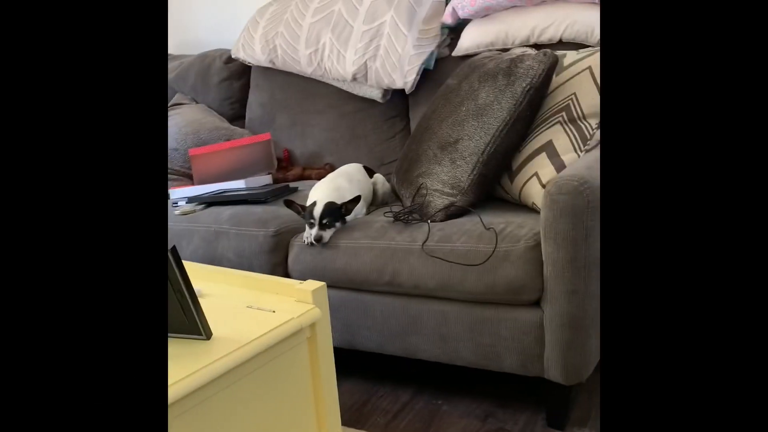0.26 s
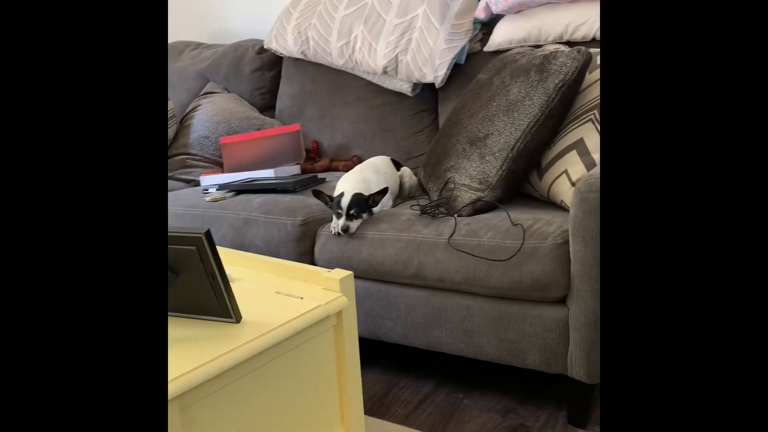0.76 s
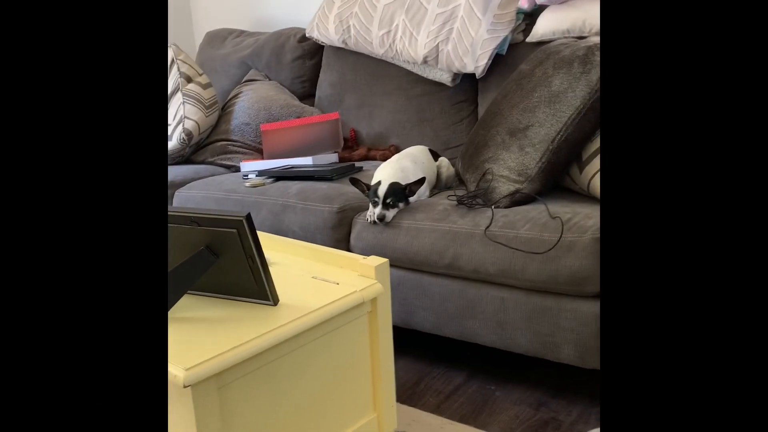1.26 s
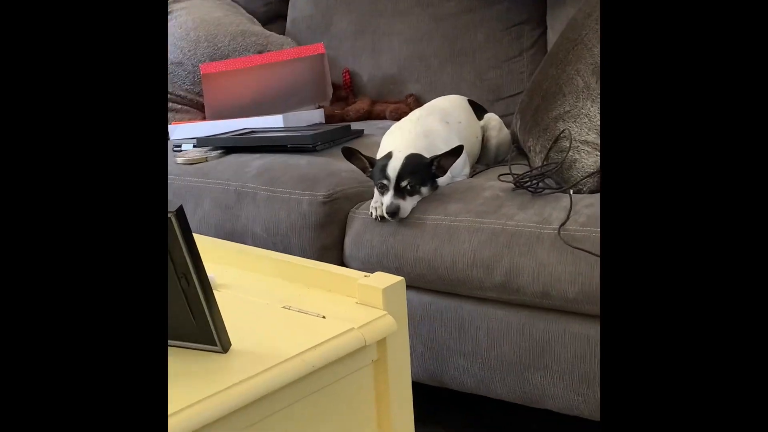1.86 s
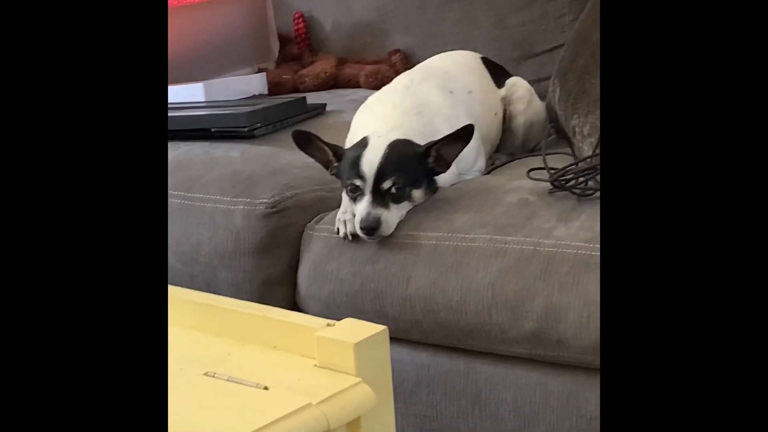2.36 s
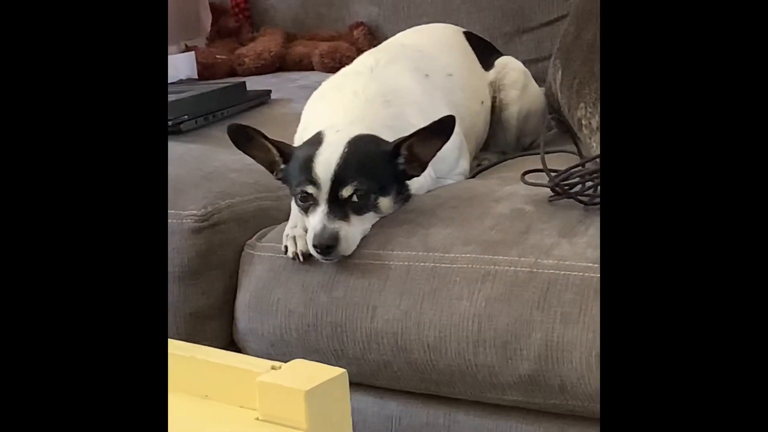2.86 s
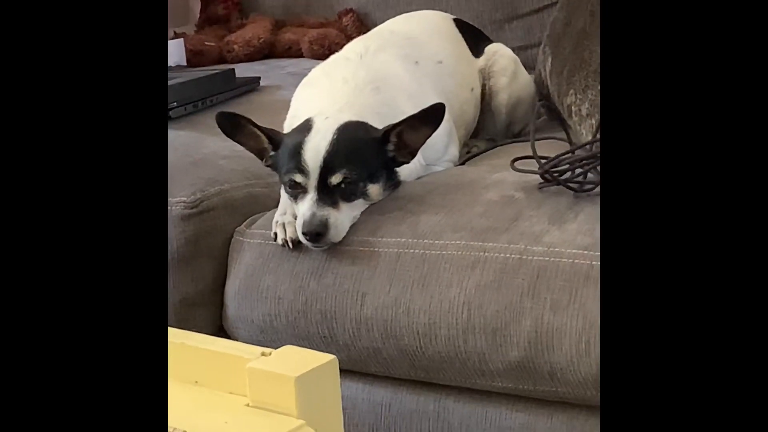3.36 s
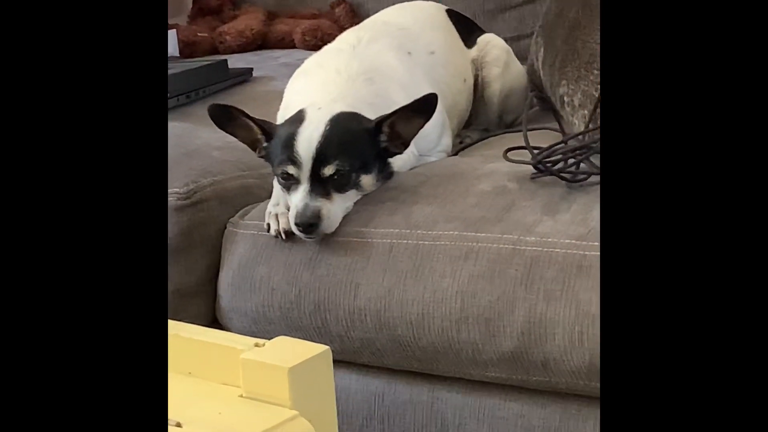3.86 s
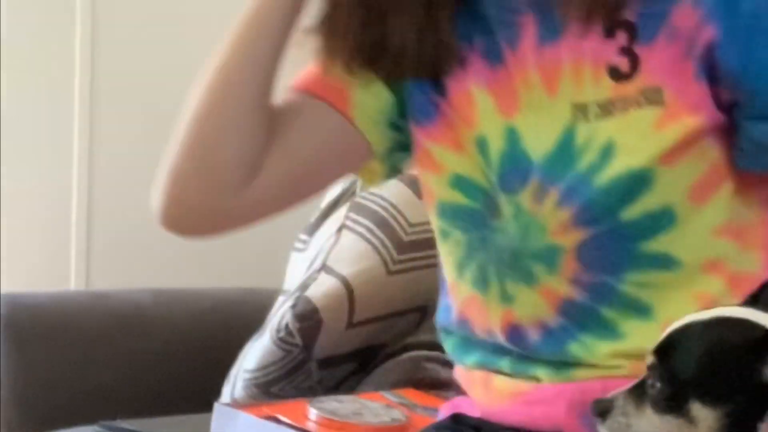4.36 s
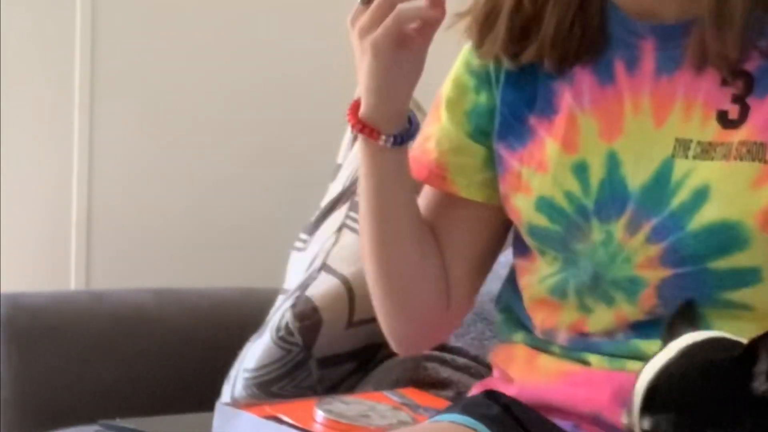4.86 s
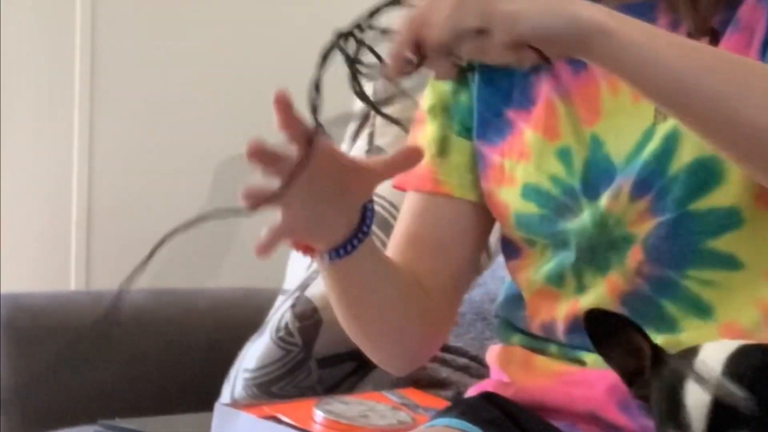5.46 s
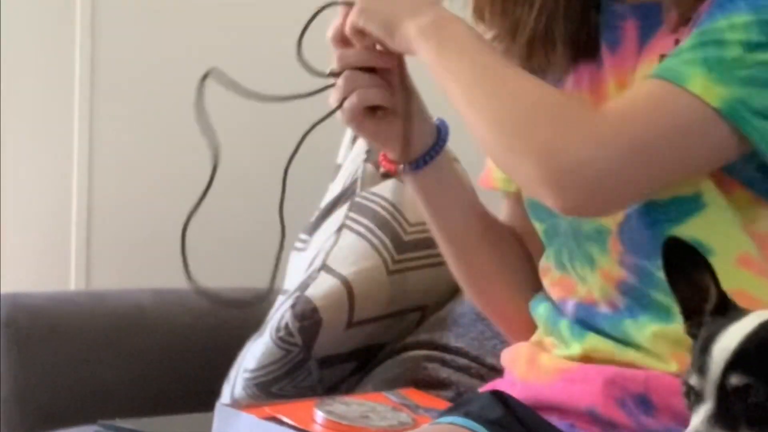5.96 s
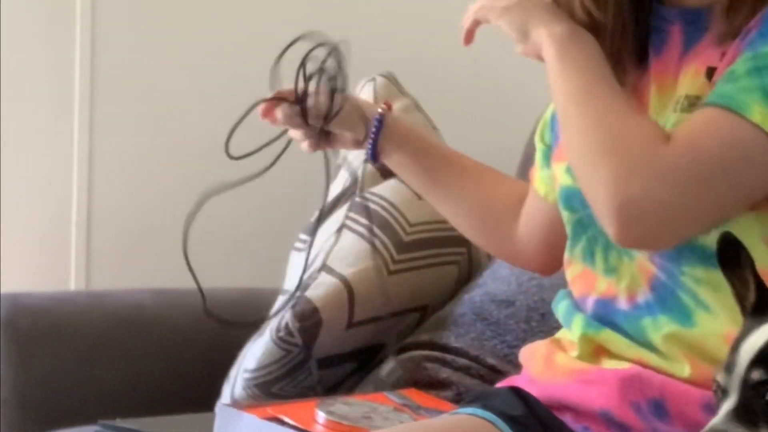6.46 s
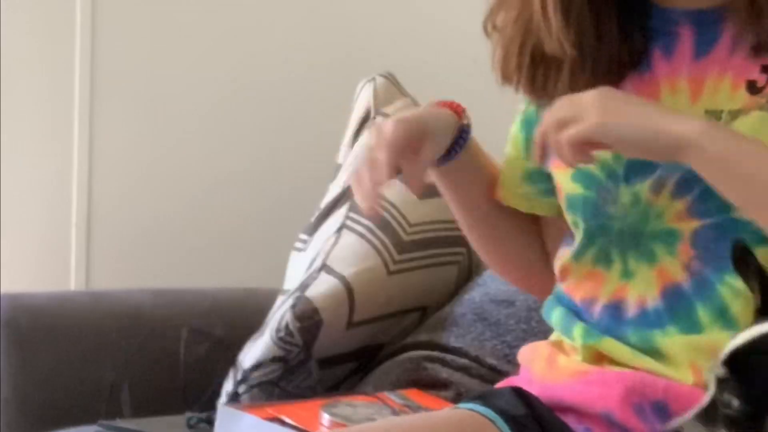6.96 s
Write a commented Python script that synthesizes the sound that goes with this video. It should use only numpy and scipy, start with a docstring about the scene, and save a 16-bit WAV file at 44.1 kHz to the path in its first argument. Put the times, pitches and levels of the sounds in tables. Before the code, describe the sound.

A vacuum cleaner runs in a living room, a broad airy rush with hollow ringing, low hum and thin fan whine. A little over halfway it switches abruptly to the same room at rest: soft bassy room tone and faint cloth and cord rustling. Near the end something small and hard hits with a loud sharp crack, then bounces and clatters briefly. Phone-like stereo microphone in the room.

```python
"""A vacuum cleaner runs in a living room: turbulent air excites duct resonances, with motor hum and fan tones.
The scene then changes to the same room at rest: cloth and a cord rustle as grains of shaped noise, with faint
squeaks and ticks, then a small hard thing drops and bounces; each blow is a noise crack plus decaying modes.
Under both lie the beating drone tones of the house; the room at rest adds a bass-heavy wash of noise.
"""
import sys
import numpy as np
from scipy import signal
from scipy.fft import rfft, irfft, next_fast_len
from scipy.io import wavfile
from scipy.ndimage import uniform_filter1d

SR = 44100
rng = np.random.default_rng(int(sys.argv[2]) if len(sys.argv) > 2 else 0)


def file_out(sig):
    """Save sig as 16-bit WAV at sys.argv[1]."""
    # one column per channel
    cols = np.atleast_2d(sig).T
    # limit, then scale
    lim = np.clip(cols, -1, 1)
    pcm = np.round(lim * 32767).astype(np.int16)
    wavfile.write(sys.argv[1], SR, pcm)


N = 317254
T = np.arange(N) / SR  # time axis [s]

# Noise spectrum of the quiet room, relative: (frequency [Hz], density [dB per Hz])
ROOM_SPECTRUM = [(25, -31), (45, -6), (70, -2), (130, -3), (200, -4.5), (260, -7.5), (350, -9),
                 (430, -10.5), (480, -14.5), (650, -14.5), (900, -21.5), (2000, -30), (2800, -36),
                 (3500, -42.5), (8000, -54), (15500, -56), (15900, -87)]
# Standing waves of the room: (frequency [Hz], width [Hz], lift [dB])
STANDING_WAVES = [(97, 27, 7.5), (166, 45, 4.5), (233, 22, 1), (387, 52, 0.5)]
# Two close tones of the house, which beat: (frequency [Hz], level [dB], wander [Hz])
DRONE_TONES = [(54.47, -45.5, 0.32), (58.83, -56, 0.21)]
# Wavering of the drone: (time [s], level [dB])
DRONE_LEVEL = [(0, -2), (.5, 0), (1.3, 0), (1.75, -3), (2.3, 1), (2.9, -2), (3.5, 0.5), (4.1, -2), (4.5, 1),
               (5.5, 1), (6.4, -.5), (7.19, 0)]
# Strokes of cloth and cord, and the noisy wash around the hits of the small hard thing, before the fibre colour:
# (peak time [s], level [dB], brightness [dB per octave], rise [s], fall [s])
NOISE_SWELLS = [(4.08, -65.5, -3.5, 0.035, 0.59), (4.2, -67, -8, 0.16, 0.27), (4.4, -74.5, -16, 0.14, 0.18),
                (4.82, -71, -3, 0.11, .4), (5.08, -66.5, -6, 0.087, .07), (5.145, -63.5, -13.5, .01, 0.17),
                (5.18, -58.5, -2, 0.073, 0.19), (5.3, -66, -5, .09, .03), (5.42, -72, -4, .15, .15),
                (5.53, -61, -13.5, 0.025, 0.18), (5.81, -72, -10, .04, .03), (6.12, -70, -12, 0.22, 0.88),
                (6.2, -74, -4, .02, 0.044), (6.275, -54, -3, 0.023, 0.11), (6.499, -46.5, -6, 0.01, .02),
                (6.515, -42.5, -2, 0.016, 0.21), (6.704, -38.5, -4, 0.01, 0.078),
                (6.735, -41.5, -5, 0.035, 0.08), (6.84, -57, -12, 0.065, 0.26),
                (7.015, -53.5, -7, 0.13, 0.088)]
# Spectrum that the rubbed fibres favour: (frequency [Hz], lift [dB])
FIBRE_COLOUR = [(200, -7.5), (700, -3.5), (1300, 0), (2500, 2.5), (3300, 3.5), (4200, -5.5), (5500, 8),
                (7000, 1.5), (9000, -3.5), (11500, -4.5), (15600, -11), (15900, -50)]
# Faint thin squeaks: (peak time [s], frequency at the peak [Hz], level [dB])
SQUEAK_EVENTS = [(6.055, 3230, -69), (6.15, 2510, -66)]
# Sharp blows: faint ticks of the cord first, then the small hard thing dropping and bouncing; before the walls:
# (time [s], peak level [dB], brightness [dB per octave], ringing share [0-1], strongest ring [Hz])
BLOWS = [(4.0073, -85, 0, 0.4, 8000), (5.145, -56, -2, 0.1, 2140), (5.528, -57, -10, 0.5, 2650),
         (5.55, -52, -9, .8, 2650), (6.266, -47, -2, 0.3, 2320), (6.5036, -6.5, 4.5, 0.33, 9500),
         (6.5052, -11.5, -3, 0.32, 8030), (6.5072, -23, -5, 0.5, 1090), (6.5086, -18, 0, 0.1, 6690),
         (6.5096, -8.5, 8.5, 0.65, 6050), (6.5113, -20, 4.5, 0.4, 3270), (6.5143, -16, -2, 0.37, 6690),
         (6.5172, -25, 4, 0.4, 1590), (6.5195, -24, 2, 0.3, 9300), (6.5217, -23, -4, 0.5, 6000),
         (6.527, -37, -4, .8, 430), (6.534, -27, 3.5, 0.7, 6000), (6.557, -36, -2, .8, 2140),
         (6.669, -39, -10, 0.5, 1600), (6.6973, -27, -3, 0.35, 1600), (6.7036, -35, 4, 0.43, 3270),
         (6.7062, -31, -3, 0.46, 1600), (6.7085, -33, -6, 0.4, 1090), (6.717, -28, -8, 0.6, 1600),
         (6.726, -25, 3, 0.1, 9300), (6.7257, -23.5, -4, 0.9, 1800), (6.732, -28, -5, .3, 1600),
         (6.736, -28, -4, 0.8, 1800), (6.742, -38, -2, 0.7, 1600), (6.7597, -42, -4, .4, 2140),
         (6.772, -43, -5, 0.4, 2140), (6.8383, -36, -14, 0.8, 1590), (6.85, -48, -6, 0.6, 2140),
         (6.889, -48, -6, 0.3, 2140), (7.014, -37.5, -15, 0.65, 1600), (7.022, -40, -10, .5, 2140),
         (7.027, -37, -16, 0.5, 1090)]
# Modes that blows and ticks excite, relative: (frequency [Hz], level [dB], t60 [s])
BODY_MODES = [(430, -8.5, 0.035), (870, -11, .015), (1090, -9.5, 0.013), (1450, -9.5, 0.028),
              (1610, -10.5, 0.02), (1800, -4, 0.011), (2110, -5, 0.022), (2650, -2, 0.0091),
              (3270, 2.5, 0.01), (3800, -2, .012), (4440, -15, 0.0052), (5980, 6.5, 0.0061),
              (6690, -0.5, 0.0051), (7400, -7, 0.0027), (8400, -3.5, .003), (9300, -6, .003),
              (10300, -8, 0.0029), (11400, -10, .003)]
# Bursts of tiny ticks: the cord rattling, then the small hard thing clattering after its hits:
# (peak time [s], level [dB], rise [s], fall [s], strongest ring [Hz])
TICK_BURSTS = [(5.17, -61, 0.042, 0.14, 1450), (5.535, -60, 0.013, 0.13, 2650),
               (6.272, -63, .008, 0.072, 8400), (6.509, -38.5, .006, .04, 1190),
               (6.525, -47, .012, .1, 6300), (6.55, -47, 0.033, .1, 2100), (6.60, -55, 0.037, 0.11, 1090),
               (6.704, -40.5, 0.0072, .03, 1450), (6.732, -40.5, .025, 0.041, 1700),
               (6.775, -55, 0.019, 0.09, 2100), (6.861, -57, 0.038, .15, 1450),
               (7.022, -59, 0.026, 0.068, 1600)]
# Reverberation of the walls: (frequency [Hz], t60 [s])
WALL_DECAY = [(300, 0.7), (1500, 0.56), (4000, 0.31), (8000, 0.21), (15000, 0.18)]
# Airflow of the vacuum at work: (time [s], level [dB])
AIRFLOW = [(0, -28.5), (.35, -27), (.7, -27), (1.2, -26.5), (1.55, -27.5), (1.9, -26.5), (2.15, -26),
           (2.4, -26), (2.6, -26.5), (2.9, -26), (3.35, -27), (3.9, -26)]
# Spectrum of the rushing air, relative: (frequency [Hz], density [dB per Hz])
AIR_SPECTRUM = [(25, -33), (45, -10), (70, -11), (95, 4), (135, -3), (170, -1), (260, -4.5), (600, -3),
                (1200, 0), (2000, 1), (3100, -0.5), (3800, -7.5), (4500, -13), (5100, -9), (6000, -9),
                (7500, -11.5), (8200, -12.5), (9300, -25.5), (10000, -12), (12500, -20), (14000, -20.5),
                (15650, -25.5), (15950, -72)]
# Resonances of hose, housing and walls: (frequency [Hz], width [Hz], mean lift [dB])
DUCT_MODES = [(92, 15, 1), (166, 19, 5), (213, 7.5, 2.5), (335, 48, 6.5), (437, 31, 5.5), (481, 22, 6),
              (538, 11, 6), (766, 46, 2), (949, 36, 7.5), (1139, 49, 3), (1311, 36, 5.5), (1551, 16, 0.5),
              (1786, 23, 4.5), (2180, 13.4, 6.5), (2852, 22, 9.5), (2970, 9.6, 1), (3120, 14, 11),
              (3225, 18, 5.5), (3440, 16, 3)]
# Tones of the fan: (frequency [Hz], mean level [dB], wander [Hz])
FAN_TONES = [(625, -49, 1.5), (4374, -54, 5)]
# The two ports at the vacuum: (frequency [Hz], likeness [0-1], left-right level [dB], left lead [rad])
VACUUM_PORTS = [(150, 1, 1.4, 0), (210, .98, 2, .03), (330, .96, 2.5, .25), (420, .88, 3.5, .5),
                (520, .65, 4.5, 1.5), (650, .2, 5.5, 0), (800, .55, 2.5, 0), (1000, .5, .5, .4),
                (1800, .4, .5, 1.), (2100, .15, .5, 2.), (2300, .45, .5, 3.1), (3000, .68, .5, 2.9),
                (3800, .55, .5, 2.), (4300, .78, 0, 2.3), (4550, .9, 0, 2.7), (4800, .97, 0, 3.14),
                (15300, .95, 0, 19.05)]
# The ports once the microphone has turned:
# (frequency [Hz], likeness [0-1], left-right level [dB], left lead [rad])
REST_PORTS = [(102, 0.99, -0.5, 0), (200, 0.99, -1.5, 0.3), (325, 0.95, -2, 0.5), (785, 0.4, 0, 2),
              (1700, 0.36, -0.5, 4), (2460, 0.5, 0.5, 4.1), (3500, .65, 0, 3.8), (4100, .9, 0, 3.7),
              (4720, .995, 0, 3.14), (16500, .99, 0, -5.9)]

FADE_OUT, FADE_IN = (3.918, 3.952), (3.949, 3.962)  # (from [s], to [s])
BASS_CUT_HZ, EDGE_HZ = 24, 16300
SIZE, HOP = 2048, 512  # samples per frame and step, for slow noises
ROOM_DB = -45
DRONE_MODE_HZ, DRONE_MODE_WIDTH_HZ, DRONE_MODE_DB = 54.6, 1.4, -61  # the room mode that blurs the drone
STROKE_DB = 20.0  # dB gained in one rise time and lost in one fall time
# Faint restless rubbing between the strokes: level [dB], brightness [dB per octave], unevenness [dB]
FIDGET_DB, FIDGET_TILT_DB, FIDGET_SPREAD_DB = -83.5, 2, -4.5
SQUEAK_RISE_S, SQUEAK_FALL_S, SQUEAK_LENGTH_S, SQUEAK_HZ_PER_S = 0.04, 0.11, 0.12, 700.0
RATTLE_PER_S, RATTLE_SPREAD_DB = 450.0, 4.0  # tick rate; spread of tick sizes
RATTLE_FOCUS_DB, RATTLE_FOCUS_OCTAVES = 22.0, 0.45  # lift of the strongest ring and its reach
HUM_HZ, HUM_DB = 120.0, -41.5  # twice the mains rate; level of its pure tone
ROAR_DB, HISS_DB = -4, 0.5  # lift of nozzle roar and hiss against the airflow
ROAR_STEADY, HISS_STEADY = 0.29, 0.41  # how far each resists the airflow's swells [dB per dB]
WHINE_WAVER_DB = 1.5  # the fan tones come and go in the turbulence
DUCT_WAVER_DB, DUCT_WANDER = 1.7, 0.005  # swell of each resonance; slide as a share of its pitch


def gain_of(db):
    """Amplitude ratio: 20 dB is a factor of ten."""
    return 10 ** (np.asarray(db) / 20)


def evened(x):
    """Normalisation to unit rms."""
    return x / np.sqrt(np.mean(x ** 2) + 1e-20)


def read(points, hz):
    """Interpolation of a spectrum along logarithmic frequency."""
    f, value = np.transpose(points)
    return np.interp(np.log(hz + 1), np.log(f + 1), value)


def curve(rows, t, axis):
    """Linear interpolation of one table column over time."""
    return np.interp(t, [r[0] for r in rows], [r[axis] for r in rows])


def tone(hz, wander_hz):
    """Frequency modulation: a sine of unit rms with a slowly wandering pitch."""
    noise_in = rng.standard_normal(N)
    drift = evened(uniform_filter1d(uniform_filter1d(noise_in, size=4000), size=4000))
    return np.sqrt(2) * np.sin(2 * np.pi * np.cumsum(hz + wander_hz * drift) / SR)


def band(hz, width):
    """Resonance of noise: a one-pole complex envelope shifted to a carrier, at unit rms."""
    pole = np.exp(-np.pi * width / SR)
    a, b = rng.standard_normal((N + SR, 2)).T
    envelope = signal.lfilter([1], [1, -pole], a + 1j * b)[SR:]  # the first second settles the filter
    carrier = np.exp(2j * np.pi * np.cumsum(hz * np.ones(N)) / SR)
    return evened((envelope * carrier).real)


def patches(frames, bins, size):
    """Smoothed random field of unit rms; size is (bins, frames)."""
    field = rng.standard_normal((frames, bins)).T
    return evened(uniform_filter1d(uniform_filter1d(field, size[0], 0), size[1], 1))


def noise(field_db, size, hop):
    """Spectral shaping: two unrelated noises under one time-frequency field."""
    a, b, c, d = rng.standard_normal(field_db.T.shape + (4,)).T
    z = np.array([a + 1j * b, c + 1j * d]) * gain_of(field_db)
    return signal.istft(z, nperseg=size, noverlap=size - hop)[1][:, :N]


def ringing_db(modes, hz):
    """Resonance: Lorentzian peaks added to a flat power spectrum."""
    peaks = sum(gain_of(db) ** 2 / (1 + (2 * (hz - f) / w) ** 2) for f, w, db in modes)
    return 10 * np.log10(1 + peaks)


def stroke_db(t, s, rise, fall):
    """Exponential growth and decay: straight lines in dB about a peak."""
    return -STROKE_DB * np.where(t < s, (s - t) / rise, (t - s) / fall)


def ports(table, direct, diffuse):
    """Partial coherence: both ports share direct; only the right one takes diffuse."""
    f, like, tilt_db, lead = np.transpose(table)
    n = next_fast_len(N)
    hz, shared = np.fft.rfftfreq(n, 1 / SR), rfft(direct, n)
    same = np.clip(np.interp(hz, f, like), 0, 1)
    delayed = same * shared * np.exp(-1j * np.interp(hz, f, lead))
    right = delayed + np.sqrt(1 - same ** 2) * rfft(diffuse, n)
    tilt = gain_of(np.interp(hz, f, tilt_db) / 2)
    return irfft(np.array([shared * tilt, right / tilt]), n)[:, :N]


def room():
    """Standing waves: a bass-heavy wash of noise gathers in a few room resonances."""
    frames, hz = N // HOP + 5, np.fft.rfftfreq(SIZE, 1 / SR)
    uneven_db = np.clip(hz / 320.0, 0, 1)[:, None] * 2.7 * patches(frames, len(hz), size=(9, 9))
    field = (read(ROOM_SPECTRUM, hz) + ringing_db(STANDING_WAVES, hz))[:, None] + uneven_db
    return gain_of(ROOM_DB) * evened(noise(field, SIZE, HOP))


def drone():
    """Beating: two close low tones, a little blurred by the room mode that carries them."""
    tones = sum(gain_of(db) * tone(f, w) for f, db, w in DRONE_TONES)
    blur = gain_of(DRONE_MODE_DB) * band(DRONE_MODE_HZ, DRONE_MODE_WIDTH_HZ)
    return gain_of(curve(DRONE_LEVEL, T, axis=1)) * (tones + blur)


def rustle():
    """Friction noise: quick uneven grains, each swell with its own brightness; also the wash around the hits."""
    t, hz = np.arange(N // 64 + 5) * 64 / SR, np.fft.rfftfreq(256, 1 / SR)
    octaves = np.log2((hz[:, None] + 780.0) / 5630.0)
    restless_db = FIDGET_SPREAD_DB * patches(len(t), 1, size=(1, 20))
    power = gain_of(FIDGET_DB + FIDGET_TILT_DB * octaves + restless_db) ** 2
    for s, db, tilt_db, rise, fall in NOISE_SWELLS:
        level = gain_of(db + stroke_db(t, s, rise, fall))
        power = power + gain_of(tilt_db * octaves) ** 2 * level ** 2
    colour_db = read(FIBRE_COLOUR, hz)[:, None] + 10 * np.log10(power)
    slips_db = 2.0 * patches(len(t), len(hz), size=(40, 2))  # quick and wide
    folds_db = 3.0 * patches(len(t), len(hz), size=(4, 14))  # folds favour other pitches
    unit = np.std(noise(np.zeros((len(hz), 40)), size=256, hop=64))  # level of uncoloured noise
    return noise(colour_db + slips_db + folds_db, size=256, hop=64) / unit


def squeak(s, hz, db):
    """Narrow-band noise: a thin band slides upward while it fades."""
    cutoff = np.clip((s + SQUEAK_LENGTH_S - T) / SQUEAK_RISE_S, 0, 1)
    level = gain_of(db + stroke_db(T, s, SQUEAK_RISE_S, SQUEAK_FALL_S)) * cutoff
    pitch = hz + SQUEAK_HZ_PER_S * np.clip(T - s, 0, SQUEAK_LENGTH_S)
    return level * band(pitch, 24.0)


def rattle():
    """Repeated impact: tiny ticks at random times excite the modes in uneven amounts."""
    out, t = np.zeros(N), np.arange(1500) / SR
    for s, db, rise, fall, hz in TICK_BURSTS:
        at = slice(round((s - 2 * rise) * SR), min(round((s + 2 * fall) * SR), N))
        chance, size = rng.random((2, SR // 2, 1))[:, :len(T[at])]
        size_db = RATTLE_SPREAD_DB * np.minimum(-np.log(size + 1e-9), 4)
        ticks = (chance < RATTLE_PER_S / SR) * gain_of(size_db)
        ticks = ticks * rng.standard_normal((SR // 2, len(BODY_MODES)))[:len(ticks)]
        rings = []
        for f, mode_db, t60 in BODY_MODES:
            focus_db = RATTLE_FOCUS_DB * np.exp(-(np.log2(f / hz) / RATTLE_FOCUS_OCTAVES) ** 2)
            rings.append(gain_of(mode_db + focus_db - 60 * t / t60) * np.sin(2 * np.pi * f * t))
        sound = signal.fftconvolve(ticks, np.transpose(rings), axes=0).sum(1)[:len(ticks)]
        out[at] += gain_of(db + stroke_db(T[at], s, rise, fall)) * evened(sound)
    return out


def walls(x):
    """Reverberation: sparse taps of random sign, each band dying at its own rate; two unrelated tails."""
    taps = np.zeros((2, SR))
    slots = np.arange(200, SR - 20, 20)
    at = slots + rng.integers(0, 20, (2, len(slots)))
    np.put_along_axis(taps, at, rng.choice([-1., 1.], at.shape), 1)
    hz, t, z = signal.stft(taps, SR, nperseg=256)
    decay = gain_of(-60 * t / read(WALL_DECAY, hz)[:, None])
    tail = signal.istft(z * decay, SR, nperseg=256)[1]
    return signal.fftconvolve(x[None], tail / np.linalg.norm(tail[0]), axes=1)[:, :N]


def knocks():
    """Modal impact: a sharp crack and a few ms of grit through modes, struck at another spot each time."""
    out, t = np.zeros(N + 2048), np.arange(2048) / SR
    cracks = rng.standard_normal((len(BLOWS), 2048))
    spread = rng.standard_normal((len(BLOWS), len(BODY_MODES)))
    bins = np.fft.rfftfreq(2048, 1 / SR)
    octaves = np.log2((bins + 2100.0) / 4000.0)
    small = 1 / (1 + (710.0 / (bins + 1)) ** 4)  # too small to radiate bass
    for (s, db, tilt_db, share, hz), grit, odd in zip(BLOWS, cracks, spread):
        modes = 0
        for (f, mode_db, t60), o in zip(BODY_MODES, odd):
            focus_db = 12.0 * np.exp(-(np.log2(f / hz) / 0.18) ** 2)
            wave = np.sin(2 * np.pi * f * (1 + 0.012 * o) * t)
            modes = modes + gain_of(mode_db + focus_db - 60 * t / t60) * wave
        ring = signal.fftconvolve(grit * np.exp(-t / 0.0014), modes)[:len(t)]
        crack = ((t == 0) * 4.4 + grit) * np.exp(-t / 0.00046)
        blow = share * ring / abs(ring).max() + (1 - share) * crack / abs(crack).max()
        # the roll leaves room for what the zero-phase filter spreads ahead of the blow
        blow = irfft(rfft(np.roll(blow, 32)) * gain_of(tilt_db * octaves) * small)
        blow = np.roll(blow, -32)[:2000]
        out[round(s * SR):][:2000] += gain_of(db) * blow / abs(blow).max()
    dry = out[:N] + rattle()
    return dry + gain_of(-5.0) * walls(dry)


def vacuum():
    """Turbulence: rushing air through ringing ducts, with hum at twice the mains rate and thin fan tones."""
    t, hz = np.arange(N // HOP + 5) * HOP / SR, np.fft.rfftfreq(SIZE, 1 / SR)
    swells = patches(len(t), len(DUCT_MODES), size=(1, 18))
    slides = patches(len(t), len(DUCT_MODES), size=(1, 50))
    # each resonance swells and slides as the hose bends
    bent = [(f * (1 + DUCT_WANDER * slide), w, db + DUCT_WAVER_DB * swell)
            for (f, w, db), slide, swell in zip(DUCT_MODES, slides, swells)]
    field = read(AIR_SPECTRUM, hz)[:, None] + ringing_db(bent, hz[:, None])
    roar = np.exp(-(np.log2((hz + 1) / 2990.0) / 0.17) ** 2)[:, None]
    hissy = np.clip(np.log2((hz + 1) / 3200.0) / 0.6, 0, 1)[:, None]  # 0 in the roar, 1 in the hiss
    flow_db = curve(AIRFLOW, T, axis=1)
    swell_db = curve(AIRFLOW, t, axis=1) - flow_db.mean()
    field = field + roar * (ROAR_DB - ROAR_STEADY * swell_db) + hissy * (HISS_DB - HISS_STEADY * swell_db)
    # reflections shift as the nozzle travels: slow narrow patches, weaker in bass and slightly in treble
    depth_db = (2.4 - 0.15 * hissy) * np.clip(hz / 650.0, 0, 1)[:, None]
    field = field + depth_db * patches(len(t), len(hz), size=(2, 24))
    field = field + 1.13 * patches(len(t), len(hz), size=(60, 4))  # gusts in the flow: short and wide
    air = gain_of(flow_db) * evened(noise(field, SIZE, HOP))
    hum = gain_of(HUM_DB) * (tone(HUM_HZ, wander_hz=0.6) + 0.25 * band(HUM_HZ, 8.0))
    whine = 0
    for f, db, wander_hz in FAN_TONES:
        waver_db = WHINE_WAVER_DB * patches(N, 1, size=(1, 6000))[0]
        whine = whine + gain_of(db + waver_db) * tone(f, wander_hz)
    return air + hum + whine


def scene():
    """Superposition: the vacuum fades out and the room at rest fades in, the drone under both."""
    first = np.sin(np.pi / 2 * np.interp(T, FADE_OUT, [1, 0])) ** 2
    second = np.sin(np.pi / 2 * np.interp(T, FADE_IN, [0, 1])) ** 2
    low = drone()
    rest = room() + rustle() + sum(squeak(*row) for row in SQUEAK_EVENTS) + knocks()
    working = ports(VACUUM_PORTS, *vacuum()) + low
    resting = ports(REST_PORTS, *rest) + low
    return first * working + second * resting


def record(dry):
    """Band limiting: the microphone drops the deepest bass, then a steep low-pass ends the treble."""
    bass_cut = signal.butter(2, BASS_CUT_HZ, "high", fs=SR, output="sos")
    thin = signal.sosfilt(bass_cut, dry)
    low_pass = signal.firwin(511, EDGE_HZ, window=("kaiser", 9), fs=SR)
    return signal.oaconvolve(thin, low_pass[None], "same")


dry = scene()
out = record(dry)
file_out(out)
```